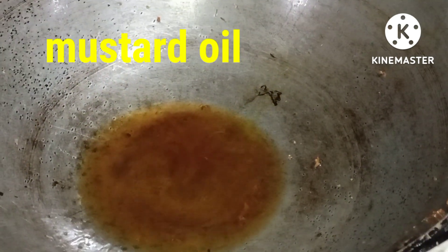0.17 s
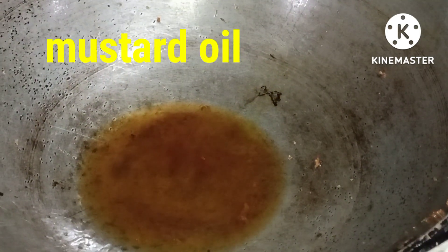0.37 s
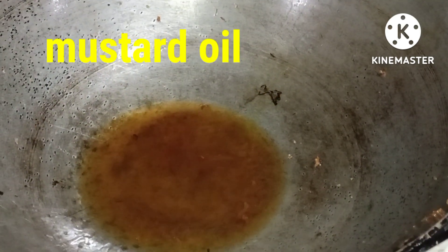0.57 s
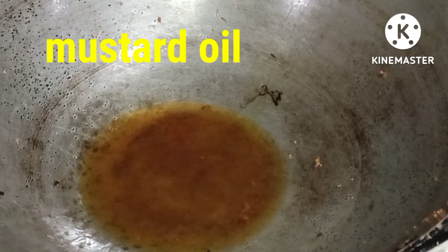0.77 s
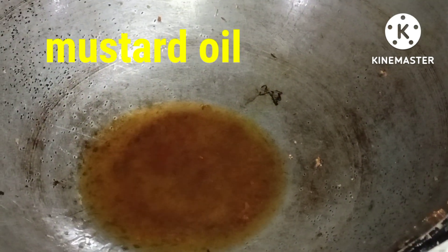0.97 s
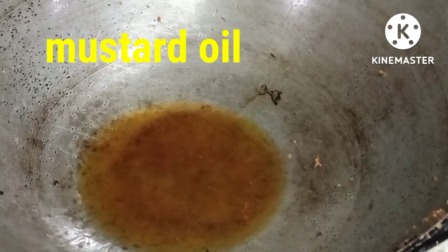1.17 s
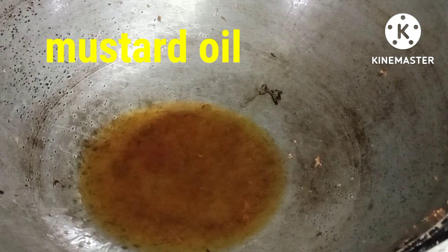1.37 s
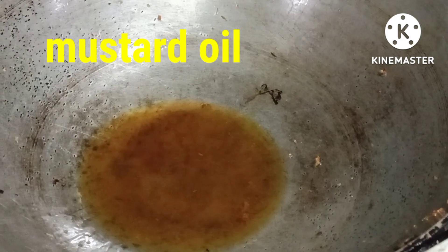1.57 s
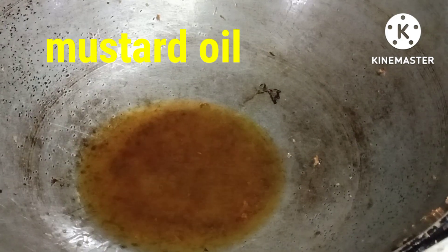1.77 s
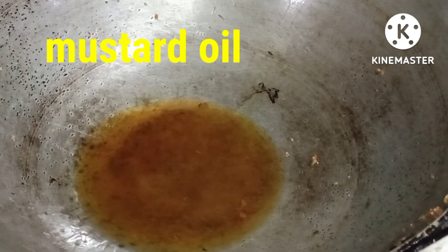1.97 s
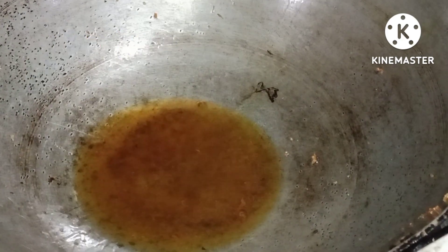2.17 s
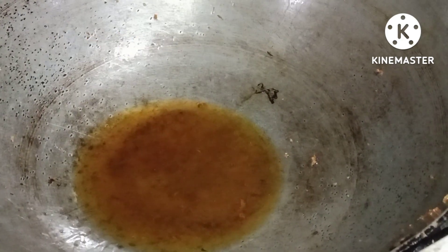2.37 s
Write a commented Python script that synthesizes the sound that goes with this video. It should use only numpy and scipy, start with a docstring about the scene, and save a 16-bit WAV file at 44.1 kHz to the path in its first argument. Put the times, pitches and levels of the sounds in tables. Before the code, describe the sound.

Sharp, bright pops of hot oil crackle up close in a wok, dense at first and then sparse, each briefly ringing the steel. A thin hiss, faint whine and soft stove rumble lie behind in the small kitchen.

```python
"""A small kitchen, one microphone close to a steel wok where water drops burst in hot oil.
Each burst is a sharp crack, a fine spray and a briefly ringing steam cavity; the bowl reflects it
and rings, and the room adds a short tail. Droplets tick and one low plop sounds among them.
Behind lie a faint wavering whine, sizzling whistles, a thin hiss and the stove's rumble."""
import sys
import numpy as np
from scipy import signal
from scipy.fft import rfft, irfft
from scipy.io import wavfile
from scipy.ndimage import uniform_filter1d

SR = 44100
rng = np.random.default_rng(int(sys.argv[2]) if len(sys.argv) > 2 else 0)


def master(y):
    """Save y as 16-bit WAV."""
    cut = np.clip(np.atleast_2d(y).T, -1, 1)
    pcm = np.round(cut * 32767)  # scale
    wavfile.write(sys.argv[1], SR, pcm.astype(np.int16))


N = 105840
SIZE = 16384  # samples in one short sound or echo response

# Drops bursting close to the microphone, levels before BURST_GAIN_DB: t/s, crack level/dB,
# cavity f/Hz, level/dB, t60/s, second resonance f/Hz, level/dB, spray level/dB, echo gain/dB
BURSTS = [ (0.236, -33, 3830, -38, 0.0042, 6860, -45, -51, 0),
          (0.3082, -41, 5214, -28.5, 0.012, 5430, -26.5, -53, -1),
          (0.321, -46, 5180, -41, 0.0051, 6680, -35, -61.5, 8),
          (0.339, -42, 5500, -31.5, 0.0059, 6300, -40, -60, -1),
          (0.3473, -29.5, 3725, -31.5, 0.017, 4800, -34, -54.5, -4.5),
          (0.3891, -38.5, 4900, -32, 0.0014, 5870, -34, -66.5, 7),
          (0.438, -25, 3090, -27, 0.011, 5343, -35, -46, -1.5),
          (0.4927, -43.5, 5870, -27, 0.012, 5710, -23, -51, 4),
          (0.5098, -49.5, 5410, -32.5, 0.0085, 5440, -26, -55.5, -4),
          (0.5712, -31.5, 4093, -29, 0.011, 5700, -43, -59.5, -7.5),
          (0.6095, -32.5, 3770, -30.5, 0.0035, 4870, -28.5, -68, 6),
          (.6150, -56, 4850, -31.5, 0.015, 4250, -30.5, -64, -2.5),
          (.6210, -26.5, 3400, -30.5, 0.002, 4500, -34.5, -66, 2.5),
          (0.6711, -20.5, 3026, -21, 0.016, 5716, -21.5, -49.5, -0.5),
          (0.6768, -30.5, 4020, -56, 0.012, 4950, -41, -62.5, 23),
          (.7720, -35.5, 3550, -45.5, 0.017, 4970, -39.5, -64, 5.5),
          (0.928, -58, 3810, -59.5, 0.0071, 6990, -54.5, -74.5, 5),
          (1.1507, -43, 4320, -40, 0.0067, 5200, -45.5, -79, 8),
          (1.1636, -30, 3485, -30, 0.0035, 4920, -40.5, -62.5, -1),
          (1.2940, -66, 3600, -56.5, .015, 3900, -66.5, -85, 1.5),
          (1.325, -64.5, 3500, -54.5, 0.0096, 3700, -53, -81.5, -1.5),
          (1.4183, -54, 5760, -38.5, 0.004, 5310, -47, -59, 0.5),
          (1.5930, -35.5, 3730, -30, 0.0078, 4635, -40.5, -73.5, -1),
          (1.6022, -33.5, 3504, -27.5, 0.0073, 4810, -36, -75, -1),
          (2.02, -79, 4905, -50, .025, 1990, -50, -77.5, -6),
          (2.0185, -63.5, 3080, -30.5, 0.0084, 6100, -40.5, -80, 4.5),
          (2.1327, -40.5, 5824, -24.5, 0.0018, 5520, -27, -48.5, -4),
          (2.3039, -46, 6030, -49, 0.006, 5700, -49, -69.5, -4.5)]
BURST_GAIN_DB, SECOND_T60_S = -2, .0077


def bursts():
    """Each drop cracks and sprays, its steam cavity rings, and the steel answers."""
    out = np.zeros(N)
    for s, crack_db, hz, db, t60, second_hz, second_db, spray_db, echo_db in BURSTS:
        pan, mist, rip = wok(echo_db), spray(echo_db), tear()
        pop = short_level(crack(rip, pan), crack_db)
        pop += short_level(through(mist, rip), spray_db)
        pop += short_level(cavity(pan, hz, t60), db)
        pop += short_level(cavity(pan, second_hz, SECOND_T60_S), second_db)
        add(out, pop, s)
    return undb(BURST_GAIN_DB) * out


def tear(t60=.004, ragged_db=-3):
    """The oil film snaps, then tears for a ragged instant, giving each burst its own colour."""
    rip = undb(ragged_db) * unit(rng.standard_normal(SIZE) * fade(t60))
    rip[0] = 1
    return rip


# Spectrum of a crack at close range: f/Hz, relative level/dB
CRACK_SPECTRUM = [(100, -35), (900, -31), (1600, -21.5), (2100, -14.5), (2600, -1.5), (3500, 8.5),
                  (4400, 2.5), (5500, -1), (7000, 2), (8000, -14), (9800, -22), (11000, -35.5),
                  (16000, -35.5)]


def crack(rip, pan):
    """The tearing film sounds through the pan as a sharp, bright crack."""
    return through(through(pan, rip), colour(CRACK_SPECTRUM))


# How well a steam cavity radiates: f/Hz, gain/dB
CAVITY_RADIATION = [(100, -33.5), (1200, -13.5), (2000, -16.5), (2600, -14), (3700, -2), (4300, -7),
                    (4900, -1.5), (6800, -3.5), (8000, 0), (11000, -6.5), (16000, -24.5)]


def cavity(pan, hz, t60, glide=.03, width_share=.32):
    """A steam pocket rings for milliseconds, rising in pitch as it opens."""
    radiated = through(pan, colour(CAVITY_RADIATION))
    return band(through(radiated, ring(hz, t60, glide)), hz, width_share * hz)


# Modes of the steel wok: f/Hz, gain/dB
WOK_MODES = [(2472, 10), (2886, -1.5), (3095, -3.5), (3388, 0.5), (3653, -5), (4351, -0.5), (4914, 0),
             (5390, 2), (5864, -2), (6800, 2.5)]


def wok(echo_db):
    """The pan's response to one burst: its echoes and its ringing modes."""
    return steel(space(echo_db), WOK_MODES, width_hz=33)


def steel(x, modes, width_hz, scatter_db=3.5):
    """The steel rings in a different blend of modes for each spot that is struck."""
    return x + sum(undb(db + scatter_db * rng.uniform(-1, 1)) * peak(x, hz, width_hz)
                   for hz, db in modes)


# Spectrum of the fine spray: f/Hz, relative level/dB
SPRAY_SPECTRUM = [(100, -35.5), (6000, -24), (8000, -2.5), (10000, -0.5), (11200, -9.5), (13000, -14.5),
                  (14200, -6), (15200, -7), (16000, -19)]
# High modes of the wok: f/Hz, gain/dB
WOK_HIGH_MODES = [(8700, 9), (9750, 9.5), (11900, 16), (15050, 9)]


def spray(echo_db):
    """Fine spray rings the wok's high modes, with a little less echo than the crack."""
    mist = steel(space(echo_db - 1.5), WOK_HIGH_MODES, width_hz=71)
    return through(mist, colour(SPRAY_SPECTRUM))


# Single bright spits: t/s, level/dB before SPIT_GAIN_DB, centre f/Hz, resonance half-width/Hz
SPIT_TICKS = [(0.126, -64.5, 5350, 400), (0.364, -49, 15400, 890), (.423, -59, 10200, 2000),
              (.585, -45.5, 9600, 496), (.732, -56.5, 12200, 683), (0.785, -46.5, 15200, 806),
              (2.021, -56.5, 8720, 1100), (2.2439, -40, 6900, 1300), (2.2447, -48, 12800, 3030),
              (2.253, -47, 7200, 1800)]
SPIT_GAIN_DB, TICK_ECHO_DB = -4, -4


def spits():
    """Tiny droplets tick high in the treble."""
    out = np.zeros(N)
    for s, db, hz, half_width_hz in SPIT_TICKS:
        tick = band(space(TICK_ECHO_DB), hz, 2 * half_width_hz)
        add(out, short_level(tick, db + SPIT_GAIN_DB), s)
    return out


# Showers in the first flurry: start t/s, end t/s, lowest f/Hz, highest f/Hz, loudest level/dB
SHOWERS = [(.35, .54, 9000, 15000, -52), (.40, .53, 3800, 7400, -42), (.58, .70, 2800, 7400, -43)]


def spatter(count=16, width_hz=1400, range_db=24):
    """Droplets rain back as tiny ticks of random time, strength and pitch."""
    out = np.zeros(N)
    for start, end, low_hz, high_hz, db in SHOWERS:
        for when, softness, pitch in rng.uniform(0, 1, (count, 3)):
            tick = band(space(TICK_ECHO_DB), low_hz + (high_hz - low_hz) * pitch, width_hz)
            add(out, short_level(tick, db - softness * range_db), start + when * (end - start))
    return out


# Modes of the one low plop: f/Hz, level/dB, t60/s
PLOP_MODES = [(811.5, -35.5, 0.038), (418, -40, .04), (290, -42.5, 0.02), (540, -49, 0.019),
              (178, -48, 0.15), (1694, -55.5, .03)]


def plop(start_s=.4295, attack_s=.005):
    """A soft low knock, like a large bubble opening."""
    out, echoes = np.zeros(N), space(echo_db=-9)
    swell = 1 - np.exp(-(np.arange(SIZE) / SR / attack_s) ** 2)
    for hz, db, t60 in PLOP_MODES:
        add(out, short_level(through(swell * ring(hz, t60), echoes), db), start_s)
    return out


# Swells of the whine behind the bursts: t/s, length/s, start f/Hz, end f/Hz, crest level/dB
WHINE_SWELLS = [(-.07, 0.38, 1255, 1390, -70.5), (.2, 0.17, 1400, 1513, -68),
                (.63, 0.14, 1256, 1210, -58.5), (.75, 0.11, 1262, 1254, -64.5),
                (.75, 0.08, 617, 596, -64.5), (1.025, 0.09, 1306, 1295, -72.5),
                (1.265, 0.12, 1290, 1240, -71), (1.41, 0.087, 1664, 1645, -74),
                (1.775, 0.091, 1370, 1262, -68), (2.045, 0.069, 1436, 1366, -61.5),
                (2.155, 0.073, 1295, 1270, -60)]


def whine():
    """A faint, rough whine comes and goes in the midrange."""
    return wavering_tones(WHINE_SWELLS, flutter_hz=330, rough=.75)


# Whistles in the sizzle: t/s, length/s, start f/Hz, end f/Hz, crest level/dB
SIZZLE_WHISTLES = [(1.724, 0.135, 3020, 2920, -59.5), (1.84, .2, 6530, 6720, -67),
                   (1.97, .6, 6700, 6750, -64.5)]


def whistles():
    """The sizzle whistles thinly near the end."""
    return wavering_tones(SIZZLE_WHISTLES, flutter_hz=220, rough=.61)


def wavering_tones(rows, flutter_hz, rough):
    """Narrow unsteady tones that swell, glide and fade."""
    t, out = np.arange(N) / SR, np.zeros(N)
    for s, length, start_hz, end_hz, db in rows:
        progress = np.clip((t - s) / length, 0, 1)
        phase = 2 * np.pi * np.cumsum(start_hz + (end_hz - start_hz) * progress) / SR
        tone = (1 + rough * walk(flutter_hz)) * np.sin(phase)
        tone += rough * walk(flutter_hz) * np.cos(phase)
        swell = np.sin(np.pi * progress ** .65) ** 1.5
        out += level(tone, db) * swell
    return out


# The stove under the wok: t/s, deep band level/dB, upper band level/dB
STOVE_LEVELS = [(0, -93, -83), (.29, -60, -101), (.39, -67.5, -60.5), (.55, -53.5, -71.5),
                (.68, -82.5, -67.5), (.81, -60.5, -72), (0.901, -71, -87.5), (1.179, -73.5, -67),
                (1.299, -76, -80.5), (1.55, -78, -76), (1.861, -70, -73.5), (2.041, -74, -56),
                (2.181, -66, -61.5), (2.4, -68, -84)]


def stove():
    """The stove rumbles in two low bands of noise that surge separately."""
    t, out = np.arange(N) / SR, np.zeros(N)
    s, deep_db, upper_db = np.array(STOVE_LEVELS).T
    for hz, width_hz, db in (73, 42, deep_db), (109, 91, upper_db):
        out += level(band(rng.standard_normal(N), hz, width_hz), np.interp(t, s, db))
    return out


# Background air and hiss at the microphone: f/Hz, relative level/dB
HISS_SPECTRUM = [(150, -13), (300, -6.5), (700, -10.5), (1300, -8.5), (2000, -17.5), (4500, -25.5),
                 (6000, -14.5), (7400, -6.5), (7900, 1), (8520, 9), (8900, -14), (10300, -9.5),
                 (11200, -27.5), (16000, -25)]


def hiss():
    """A thin, nearly steady hiss with a fine whistle in it."""
    air = level(through(rng.standard_normal(N), colour(HISS_SPECTRUM)), db=-64.5)
    air *= undb(.2 * walk(rate_hz=35))
    return air + level(band(rng.standard_normal(N), hz=8860, width_hz=47), db=-77.5)


def simmer(width_hz=160, flicker_db=4):
    """Simmering oil keeps the wok faintly and unevenly ringing, mostly in its lowest modes."""
    out = np.zeros(N)
    for hz, _ in WOK_MODES:
        mode = band(rng.standard_normal(N), hz, width_hz)
        out += mode * undb(flicker_db * walk(rate_hz=8)) / hz
    return level(out, db=-84)


def space(echo_db, first_echo_s=.0016):
    """From a spot in the oil to the microphone: direct sound, bowl echoes, the kitchen's tail."""
    late = np.arange(SIZE) / SR > first_echo_s
    bowl, room = rng.standard_normal((2, SIZE)) * late
    bowl = undb(3.5) * unit(bowl * fade(t60=.092))
    room = undb(-.5) * unit(room * fade(t60=.19))
    response = undb(echo_db) * (bowl + room)
    response[0] = 1  # direct sound
    return response


def undb(db):
    """Decibels to gain."""
    return 10 ** (np.asarray(db) / 20)


def unit(x):
    """Scale to unit energy."""
    return x / np.sqrt(np.sum(x ** 2) + 1e-20)


def level(x, db):
    """Scale to an rms level."""
    return unit(x) * np.sqrt(len(x)) * undb(db)


def short_level(x, db):
    """Scale a short sound to its level over a fiftieth of a second."""
    return unit(x) * np.sqrt(SR / 50) * undb(db)


def add(out, x, s):
    """Mix x in at s seconds."""
    i = int(round(s * SR))
    x, i = x[max(-i, 0):], max(i, 0)
    out[i:i + len(x)] += x[:max(len(out) - i, 0)]


def through(x, response):
    """Filter by an impulse response."""
    return signal.fftconvolve(x, response)[:len(x)]


def fade(t60):
    """Exponential decay, 60 dB in t60 seconds."""
    return np.exp(-np.log(1000) * np.arange(SIZE) / SR / max(t60, 1e-4))


def ring(hz, t60, glide=0):
    """One struck mode; glide raises its pitch by that share as it dies away."""
    decay = fade(t60)
    pitch_hz = hz * (1 + glide * (.5 - decay))
    return decay * np.sin(2 * np.pi * np.cumsum(pitch_hz) / SR)


def colour(points, size=2048):
    """Minimum-phase response with the given spectrum (f/Hz, level/dB)."""
    hz, db = np.array(points, float).T
    bins_hz = np.fft.rfftfreq(size, 1 / SR) + 1
    gain = undb(np.interp(np.log(bins_hz), np.log(hz), db))
    cepstrum = irfft(np.log(gain))
    cepstrum[1:size // 2] *= 2
    cepstrum[size // 2 + 1:] = 0
    return irfft(np.exp(rfft(cepstrum)))


def peak(x, hz, width_hz):
    """A resonance with unit gain at its centre."""
    return signal.lfilter(*signal.iirpeak(min(hz, 20000), hz / width_hz, fs=SR), x)


def band(x, hz, width_hz):
    """A resonance applied twice, for steep skirts."""
    return peak(peak(x, hz, width_hz), hz, width_hz)


def walk(rate_hz):
    """Smooth random wandering with an rms of 1."""
    hold = max(int(SR / rate_hz), 1)
    steps = rng.standard_normal(N)[np.arange(N) // hold]
    return level(uniform_filter1d(uniform_filter1d(steps, hold), hold), 0)


def scene():
    """The spitting oil up close and the background behind it, in mono."""
    tones = whine() + whistles()
    oil = bursts() + spits() + spatter() + plop()
    return (oil + tones + hiss() + stove() + simmer())[None]


def record(dry, top_hz=15500):
    """The recorder cuts the top of the treble steeply."""
    return signal.sosfilt(signal.ellip(8, .2, 70, top_hz, fs=SR, output="sos"), dry)


dry = scene()
out = record(dry)
master(out)
```